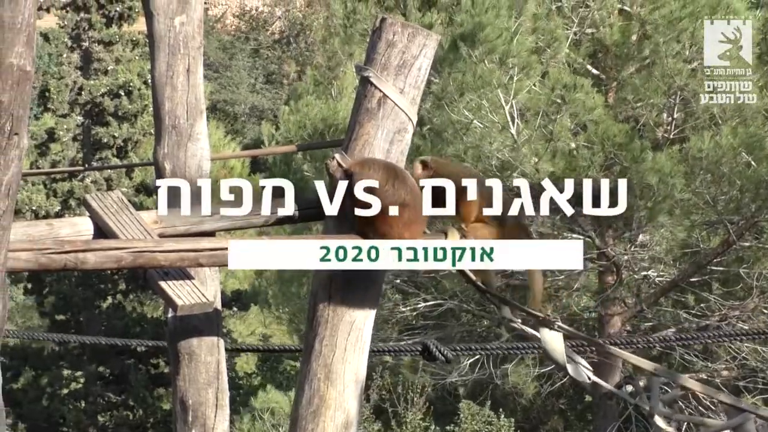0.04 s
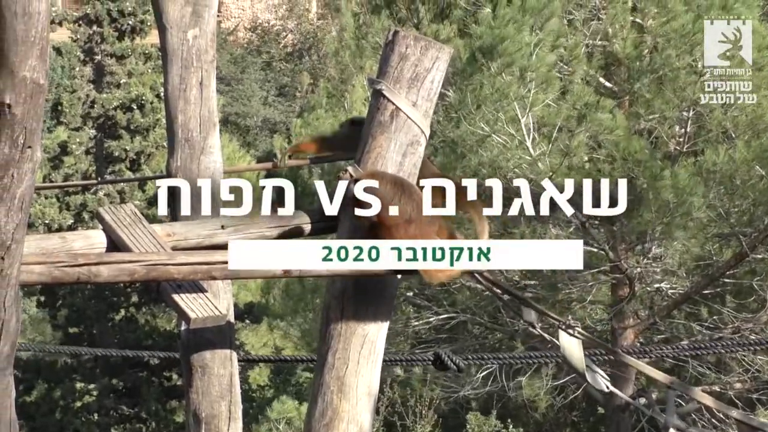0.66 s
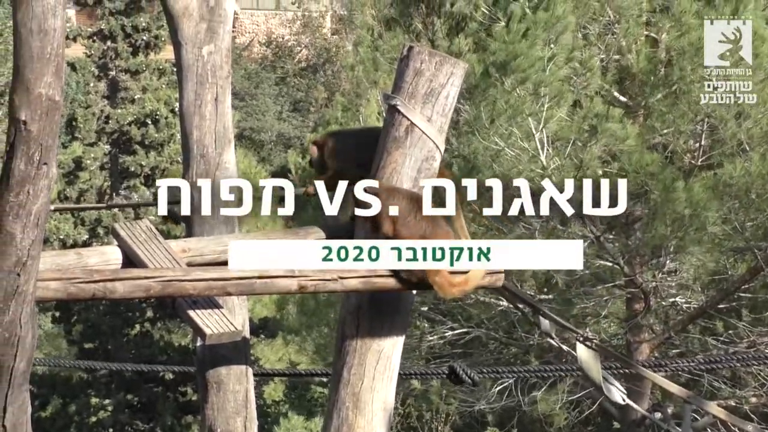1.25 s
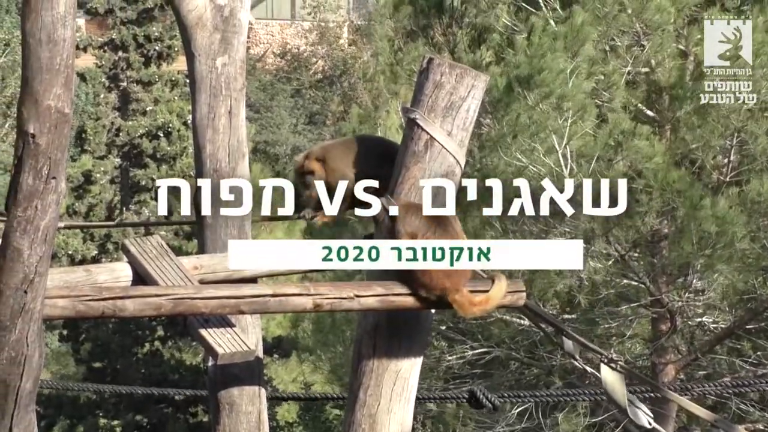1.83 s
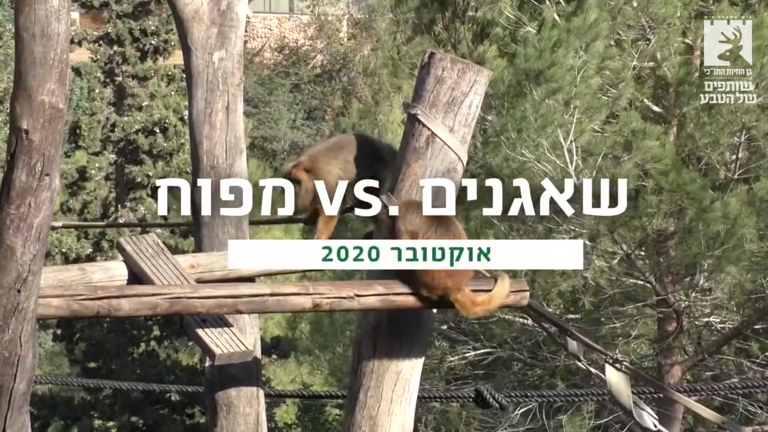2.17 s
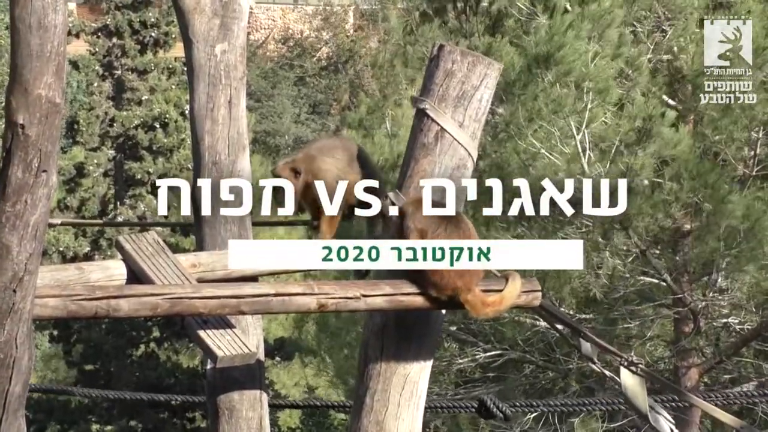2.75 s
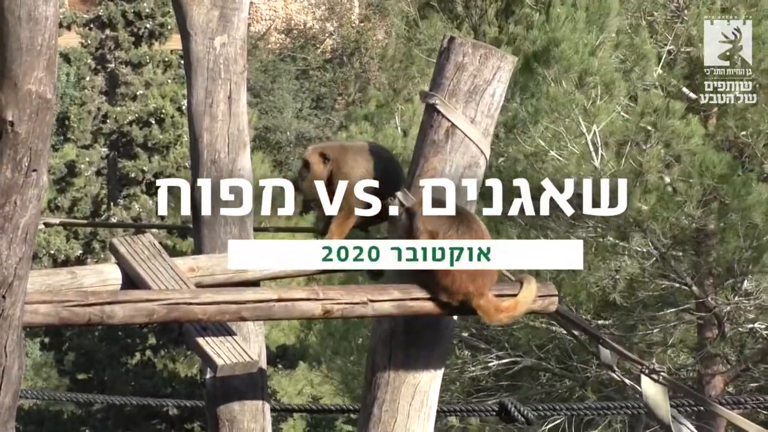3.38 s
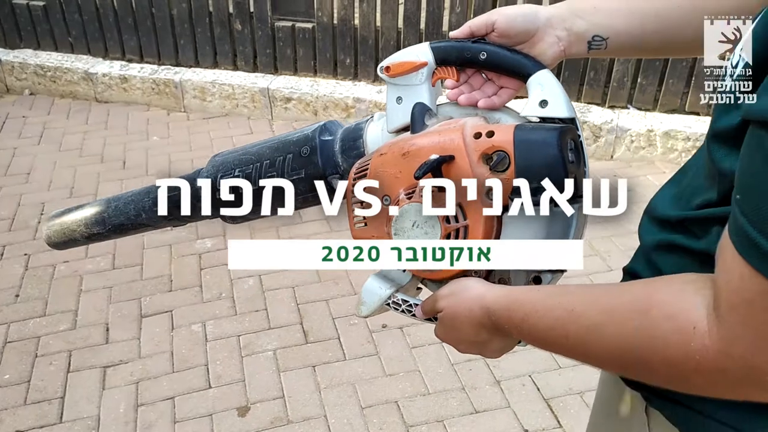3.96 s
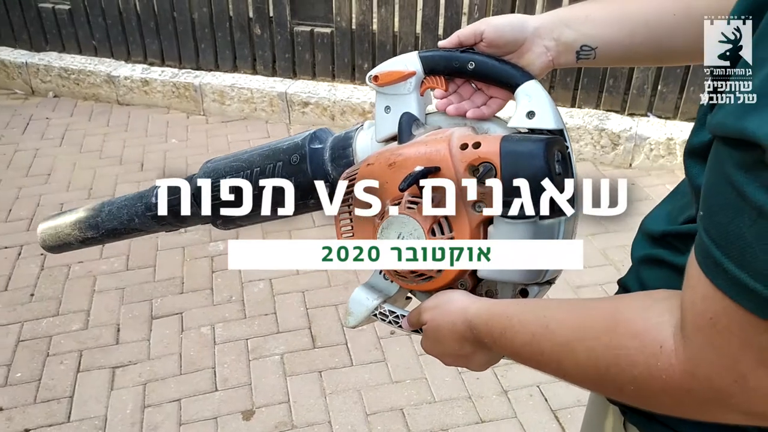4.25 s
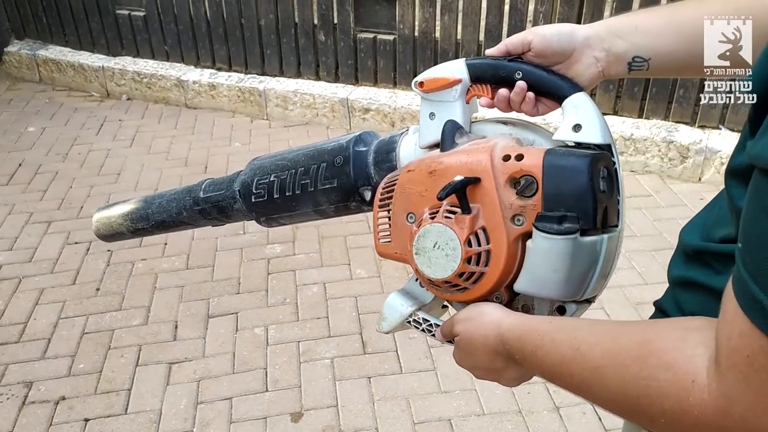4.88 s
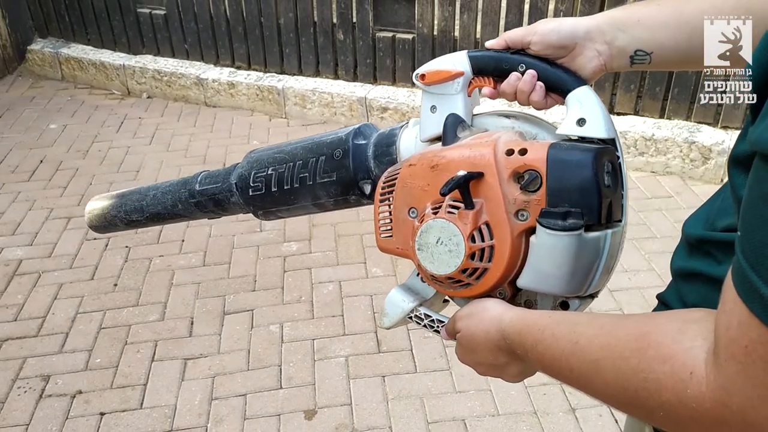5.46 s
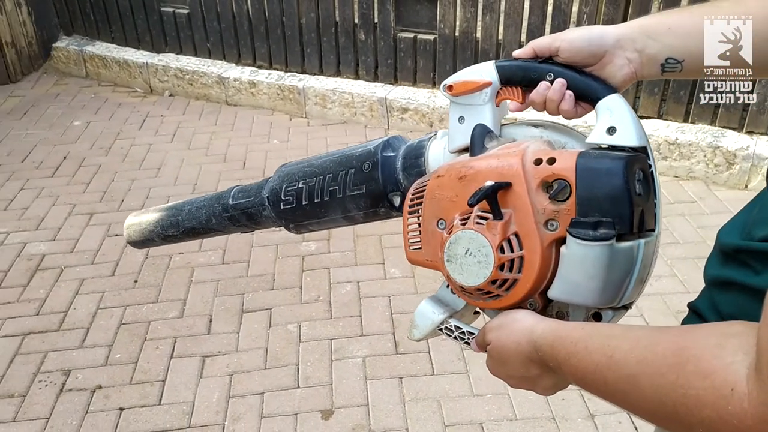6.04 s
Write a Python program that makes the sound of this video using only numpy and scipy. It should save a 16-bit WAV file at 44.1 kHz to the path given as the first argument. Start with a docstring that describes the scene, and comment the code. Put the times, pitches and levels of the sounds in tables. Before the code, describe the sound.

Crickets chirp over a faint insect buzz, then a close petrol leaf blower cuts in, idles unevenly and revs once.

```python
"""A quiet wooded park: over a distant rumble, a thin insect buzz and a far chorus, two crickets scrape
their wings. After a short silence a two-stroke leaf blower cuts in close by and coasts down to an
uneven idle. Every turn puffs through the muffler and shakes the housing while the fan rushes; runs of
lone firings, every second to fifth turn, add a thump and a rasp. Last, it is revved once and falls back."""
import sys
import numpy as np
from scipy import signal
from scipy.fft import rfft, irfft
from scipy.io import wavfile
from scipy.ndimage import uniform_filter1d

SR = 44100
rng = np.random.default_rng(int(sys.argv[2]) if len(sys.argv) > 2 else 0)


def put_to_file(sound):
    """Save the sound as 16-bit audio at rate SR, in the file named by the first command-line argument."""
    columns = np.atleast_2d(sound).T  # one column per channel
    safe = np.clip(columns, -1, 1)
    whole_steps = np.round(safe * 32767)
    wavfile.write(sys.argv[1], SR, whole_steps.astype(np.int16))


N = 273861
T = np.arange(N) / SR


def undb(db):
    """Decibels to gain."""
    return 10 ** (np.asarray(db) / 20)


def unit(x):
    """Scale to rms 1."""
    return x / np.sqrt(np.mean(x ** 2))


def noise():
    """Two unrelated white noises."""
    return rng.standard_normal((2, N))


def walk(rate_hz):
    """Smooth random drift, rms 1."""
    step = int(SR / rate_hz)
    stairs = np.repeat(rng.standard_normal(N // step + 1), step)
    return unit(uniform_filter1d(stairs, step)[:N])


def colour(x, curve, size=2 ** 19):
    """EQ by a curve of f/Hz, level/dB."""
    hz, db = np.transpose(curve)
    bins = np.maximum(np.fft.rfftfreq(size, 1 / SR), 1)
    gain = undb(np.interp(np.log(bins), np.log(hz), db))
    return irfft(rfft(x, size) * gain)[..., :N]


def resonate(x, hz, width_hz):
    """One resonance, gain 1 at its centre."""
    return signal.lfilter(*signal.iirpeak(hz, hz / width_hz, SR), x)


def spread(pair, side_eq):
    """Mid and side to left and right; the side EQ sets the width."""
    return pair[0] + colour(pair[1], side_eq) * np.array([[1], [-1]])


def pan(left_db):
    """Channel gains for a left minus right level."""
    return undb(np.array([[left_db], [-left_db]]) / 2)


def from_left(x, samples):
    """The sound reaches the right channel a little later."""
    return np.array([x[0], np.roll(x[1], samples)])


# tone of the rumble: f/Hz, level/dB
RUMBLE_EQ = [(20, 0), (40, -6), (100, -10.5), (200, -11), (400, -14), (800, -18), (1300, -23), (2000, -29),
             (3500, -32), (6500, -34.5), (11000, -40.5), (16000, -38.5)]
# its stereo width: f/Hz, side minus mid level/dB
RUMBLE_WIDTH = [(40, 0), (150, -2.5), (700, -3.5), (2400, 0.5), (12000, 2)]
def rumble(level_db=-63):
    """A wide, dark, almost steady bed of distant noise."""
    bed = unit(colour(noise(), RUMBLE_EQ))
    return spread(bed, RUMBLE_WIDTH) * undb(level_db + .089 * walk(4))


# skirt of the insect's shrill: offset from its centre f/Hz, level/dB
SHRILL_EQ = [(350, 0), (520, -3), (750, -11), (1100, -23), (2000, -42), (4000, -70)]
def insect_buzz(beat_hz=21.5, centre_hz=8330, sweep_hz=150, throb=.14):
    """A narrow shrill hiss that slides a little with every wing beat."""
    beats = 2 * np.pi * np.cumsum(beat_hz * (1 + .04 * walk(4))) / SR
    carrier = 2 * np.pi * np.cumsum(centre_hz + sweep_hz * np.sin(beats)) / SR
    shrill = colour(noise(), SHRILL_EQ) * np.cos(carrier) + colour(noise(), SHRILL_EQ) * np.sin(carrier)
    return unit(shrill * (1 + throb * np.cos(beats)))


def cricket_chorus(hz=4680, width_hz=470, level_db=-71):
    """Far crickets blur into one shimmering band."""
    band = resonate(resonate(noise(), hz, width_hz), hz, width_hz)
    return unit(band) * undb(level_db + .96 * walk(25))


def cricket(chirps, strokes, sag, rasp, echo_db, echo_t60_s, overtone_db, left_rad):
    """Each wing stroke swells and sags in pitch as the scraper slows; the trees ring on after it."""
    envelope, hz = np.zeros(N), np.full(N, float(strokes[0][2]))
    for start, db in chirps:
        for delay, length, pitch, stroke_db in strokes:
            first = int((start + delay - length / 2) * SR)
            u = np.linspace(0, 1, int(length * SR))
            envelope[first:first + len(u)] += undb(db + stroke_db) * np.sin(np.pi * u ** 1.2)
            hz[first:first + len(u)] = pitch * (1 + sag * (u / 4 - u ** 4))
    # the teeth of the wing catch unevenly
    phase = 2 * np.pi * np.cumsum(hz * (1 + .0356 * rasp * walk(700))) / SR
    envelope *= undb(4.5 * rasp * walk(300))
    phase = phase + np.array([[left_rad], [0]])
    overtones = np.sin(2 * phase) + np.sin(3 * phase) / 2
    song = envelope * (np.sin(phase) + undb(overtone_db) * overtones)
    tail = noise()[:, :SR] * undb(-60 * T[:SR] / echo_t60_s)
    tail /= np.sqrt(np.sum(tail ** 2) / 2)
    return song + undb(echo_db) * signal.fftconvolve(song, tail, axes=1)[:, :N]


# chirp cues: t/s, level/dB
NEAR_CHIRPS = [(.242, -38.5), (.625, -39.5), (.952, -40), (1.368, -39.5), (1.94, -38.5), (2.286, -40),
               (2.656, -39.5), (2.986, -40.5), (3.376, -41)]
FAR_CHIRPS = [(.177, -44.5), (.946, -40.5), (1.814, -40), (2.436, -40), (3.064, -39)]
# wing strokes of a chirp: centre after the cue t/s, length/s, f/Hz, level/dB
NEAR_STROKES = [(0, .021, 5255, 0.5), (0.0313, .024, 5294, 1), (0.0733, .023, 5345, 3)]
FAR_STROKES = [(0, .016, 4640, -11), (0.037, 0.02, 4650, -5), (0.072, .028, 4730, 1)]
def two_crickets():
    """A pure-toned cricket up front, a lower, grittier one behind."""
    near = cricket(NEAR_CHIRPS, NEAR_STROKES, sag=.04, rasp=.18,
                   echo_db=-17, echo_t60_s=.9, overtone_db=-41, left_rad=2.28)
    far = cricket(FAR_CHIRPS, FAR_STROKES, sag=.0538, rasp=.71,
                  echo_db=-9, echo_t60_s=.17, overtone_db=-29, left_rad=2.4)
    return near * pan(3) + far * pan(1.2)


def entrance(start_s=3.609, fade_db=-10.5, fade_s=.088, swell_db_per_s=.36):
    """The blower's fader: it cuts in quietly, comes up fast and goes on swelling a little."""
    since = np.maximum(T - start_s, 0)
    db = fade_db * np.exp(-since / fade_s) + swell_db_per_s * (since - since[-1] / 2)
    return np.minimum(since / .0011, 1) * undb(db)


# trigger squeezes: press t/s, release t/s, depth/0-1
TRIGGER = [(3.4, 3.87, .35), (5.326, 5.87, 0.99)]
def trigger_load(rise_s=.085, fall_s=.065):
    """Load 0-1: it climbs while the trigger is held and dies away once it is let go."""
    load = 0
    for on, off, depth in TRIGGER:
        held, released = np.maximum(T - on, 0), np.maximum(T - off, 0)
        load += depth * (1 - np.exp(-held / rise_s)) * np.exp(-(released / fall_s) ** 2)
    return load


def drive(hz, load, idle_db, octave_db, load_db, idle_hz=60):
    """Gain of one engine layer, riding on shaft speed and load."""
    return undb(idle_db + octave_db * np.log2(hz / idle_hz) + load_db * load)


def knocks(turns, decay_turns, scatter_db):
    """A sharp attack and decay once a turn, each of its own strength."""
    sizes = undb(scatter_db * rng.standard_normal(N // 100))
    return sizes[turns.astype(int)] * np.exp(-(turns % 1) / decay_turns)


# muffler resonances: f/Hz, width/Hz, level/dB
MUFFLER_MODES = [(72.3, 27, -9.5), (149, 38, -7.5), (218, 52, -6), (353, 137, -2.5), (409.4, 46, -1),
                 (573, 120, -6)]
def muffle(x):
    """The muffler gives the exhaust its hollow body; rms 1 out."""
    return unit(sum(undb(db) * resonate(resonate(x, f, w), f, w) for f, w, db in MUFFLER_MODES))


def exhaust_puffs(hz, turns, load):
    """The exhaust port opens once a turn and lets out a turbulent puff."""
    gas = noise() * (knocks(turns, decay_turns=.3, scatter_db=.8) + .25)
    return muffle(gas) * drive(hz, load, idle_db=-28, octave_db=3.9, load_db=-2.8)


def coasting(hz, load, full_hz_per_s=28, smooth_s=.11, freewheel_load=.23):
    """How freely the shaft runs down, 0-1; a little throttle ends it."""
    slowing = -uniform_filter1d(np.gradient(hz) * SR, int(smooth_s * SR))
    return np.clip(slowing / full_hz_per_s, 0, 1) * np.clip(1 - load / freewheel_load, 0, 1)


# drone partials: multiple of the shaft rate, idle level/dB, full-load level/dB
HARMONICS = [(1, -41, -35), (2, -40.5, -26), (3, -46.5, -23.5), (4, -38, -29.5), (5, -34, -18.5),
             (6, -39.5, -30), (7, -30, -25.5), (8, -68, -30), (9, -36.5, -32), (10, -39, -42),
             (11, -40, -31), (12, -36.5, -37)]
def drone(hz, turns, load, muffler_hz=400, width_hz=110, boost_db=5.5, flutter_db=.7, coast_db=-7):
    """Shaft harmonics follow the load, swell at the muffler's main resonance and sink when coasting."""
    tone = 0
    for k, idle_db, full_db in HARMONICS:
        detune = 2 * (k * hz - muffler_hz) / width_hz
        db = idle_db + load * (full_db - idle_db) + boost_db / (1 + detune ** 2) + flutter_db * walk(25)
        # the longer path through the muffler delays the harmonics unequally
        tone -= undb(db) * np.cos(2 * np.pi * k * turns - np.arctan(detune) - k ** 2 / 10)
    return tone * undb(.2 + coast_db * coasting(hz, load))


def piston_blows(turns, return_gain=.61):
    """The piston knocks at both ends of its stroke."""
    first = knocks(turns, decay_turns=.25, scatter_db=1.3)
    return first + return_gain * knocks(turns + .5, decay_turns=.25, scatter_db=1.6)


# tone of the housing: f/Hz, level/dB
HOUSING_EQ = [(200, -84), (450, -13), (600, -6), (750, 5.5), (900, 0.5), (1040, 3.5), (1270, 1.5),
              (1480, -4.5), (1700, 0.5), (1920, 4.5), (2100, -4.5), (2350, -16), (3000, -20), (6000, -24)]
def housing_clatter(hz, turns, load, blows):
    """The housing answers every turn partly the same way and partly by chance."""
    since_knock = (turns % 1 * SR / hz).astype(int)
    repeating = (.45 + .2 * load) * noise()[:, since_knock]
    ring = (repeating + noise()) * (.35 + blows)
    return unit(colour(ring, HOUSING_EQ)) * drive(hz, load, idle_db=-25.5, octave_db=1, load_db=3.3)


# tone of the rushing air: f/Hz, level/dB
FAN_EQ = [(1200, -2.5), (2400, -2), (3000, 2), (3400, 2.5), (4700, 1), (5500, 0.5), (6300, -7), (7100, -4),
          (7700, -4.5), (8600, -5), (10200, -4.5), (12100, -6), (13000, -13), (16000, -24)]
def fan_rush(hz, load, blows, pulsing=.081):
    """Bright air from the fan, pulsing faintly with the piston."""
    air = noise() * (1 + pulsing * blows)
    return unit(colour(air, FAN_EQ)) * drive(hz, load, idle_db=-35, octave_db=5.7, load_db=2.4)


# casing and fin resonances: f/Hz, width/Hz, level/dB
CASING_MODES = [(2910, 21, 1), (3770, 12, 1), (3800, 16, -15), (4674, 57, 0), (5400, 35, 0), (7160, 50, 4),
                (8550, 140, 5), (9580, 58, 5.5), (10360, 88, 0.5)]
def casing_ring(hiss, trim_db=-1.5):
    """The hiss plus the ringing it stirs in the fan casing and cooling fins."""
    ring = sum(undb(db) * resonate(hiss, f, w) for f, w, db in CASING_MODES)
    return (hiss + ring) * undb(trim_db)


# runs of lone, rasping firings: first t/s, end t/s, spacing/turns, rasp level/dB
FIRING_RUNS = [(3.627, 3.75, 2, -32), (3.771, 3.805, 2, -28), (3.862, 4.05, 3, -27.5),
               (4.086, 4.42, 4, -27), (4.449, 4.98, 3, -27.5), (5.035, 5.525, 3, -29),
               (5.553, 5.63, 4, -28), (5.972, 6.19, 5, -29.5)]
def lone_firings(turns):
    """A firing every few turns while coasting, idling and climbing into the rev: t/s, level/dB."""
    cues = []
    for first, end, every, db in FIRING_RUNS:
        fired = np.arange(*np.interp([first, end], T, turns), round(every))
        cues += [(s, db) for s in np.interp(fired, turns, T)]
    return cues


# tone of a firing's rasp: f/Hz, level/dB
RASP_EQ = [(1500, -27), (3000, -6), (4800, 5.5), (6500, -1.5), (8500, -0.5), (10200, 2), (12000, 2.5),
           (16000, -6)]
def firing_rasp(firings, width_s=.0039, scatter_db=1.5, trim_db=-2):
    """Each lone firing spits a short swell of gritty treble."""
    grit = unit(colour(noise() * undb(2 * walk(900)), RASP_EQ))
    bursts = np.zeros(N)
    for s, db in firings:
        span = slice(int((s - 4 * width_s) * SR), int((s + 4 * width_s) * SR))
        swell = np.exp(-((T[span] - s) / width_s) ** 2 / 2)
        bursts[span] += undb(db + scatter_db * rng.standard_normal()) * swell
    return grit * bursts * undb(trim_db)


def firing_thumps(firings, turns, port_turns=.12, level_db=-36.5):
    """Each lone firing thumps the muffler with an equal pulse as the exhaust port opens."""
    openings = np.round(np.interp([s for s, _ in firings], T, turns)) + port_turns
    pulses = np.zeros(N)
    pulses[np.searchsorted(turns[:-1], openings)] = -1
    return muffle(pulses) * undb(level_db)


# crankshaft speed: t/s, f/Hz
SHAFT_SPEED = [(3.61, 78.08), (3.78, 75.66), (4.31, 63.12), (4.36, 61.02), (4.59, 58.18), (4.66, 57.74),
               (4.99, 61.51), (5.35, 64.02), (5.56, 75.62), (5.76, 83.24), (5.88, 85.56), (5.97, 82.07),
               (6.02, 79.12), (6.05, 75.7), (6.2, 68.74)]
# the blower's stereo width: f/Hz, side minus mid level/dB
BLOWER_WIDTH = [(100, -28), (300, -20), (700, -14), (1400, -9), (3000, -2), (12000, 0)]
def blower():
    """One crankshaft drives the exhaust, the housing clatter and the fan."""
    hz = np.interp(T, *np.transpose(SHAFT_SPEED))
    load = trigger_load()
    jitter = .005 * (1 - load / 2) * walk(40)  # the shaft runs more evenly under load
    turns = np.cumsum(hz) / SR + jitter + 1
    firings = lone_firings(turns)
    puffs = spread(exhaust_puffs(hz, turns, load), BLOWER_WIDTH)
    exhaust = puffs + drone(hz, turns, load) + firing_thumps(firings, turns)
    blows = piston_blows(turns)
    clatter = spread(housing_clatter(hz, turns, load, blows), BLOWER_WIDTH)
    hiss = spread(casing_ring(fan_rush(hz, load, blows) + firing_rasp(firings)), BLOWER_WIDTH)
    return from_left(exhaust * pan(-1.3), 2) + from_left(clatter * pan(.91), 3) + hiss * pan(.15)


# the low end that comes in late: f/Hz, level/dB
LOW_END_EQ = [(90, 0), (140, -20), (300, -60)]
def late_bass(x, full_s=3.87, rise_s=.08, cut=.77):
    """The sound is thin at first, then its deepest bass fills in."""
    return x - colour(x, LOW_END_EQ) * cut * np.clip((full_s - T) / rise_s, 0, 1)


def scene(park_end_s=3.566):
    """The park, a moment of silence, then the blower."""
    park = rumble() + insect_buzz() * undb(-60.3) * pan(.5) + cricket_chorus() + two_crickets()
    return park * (T < park_end_s) + late_bass(blower()) * entrance()


def record(dry, top_hz=15950):
    """A steep high cut on the whole mix."""
    return signal.sosfilt(signal.ellip(10, .2, 80, top_hz, fs=SR, output="sos"), dry)


dry = scene()
out = record(dry)
put_to_file(out)
```